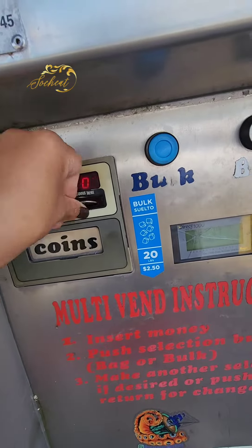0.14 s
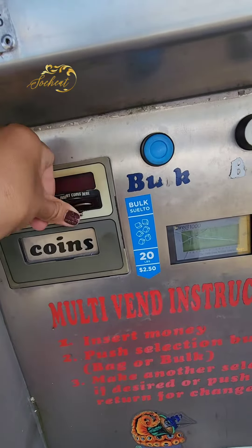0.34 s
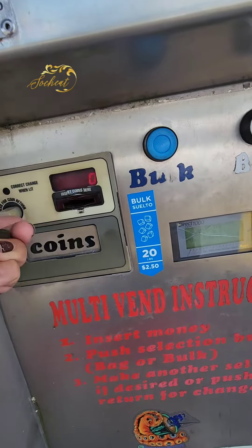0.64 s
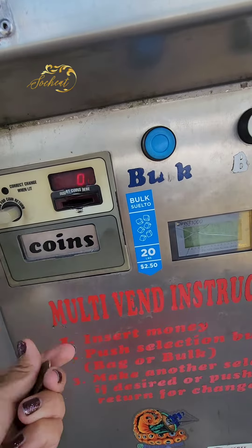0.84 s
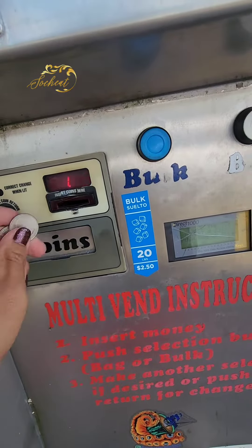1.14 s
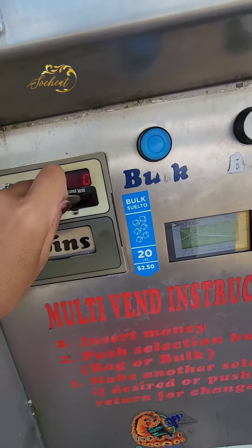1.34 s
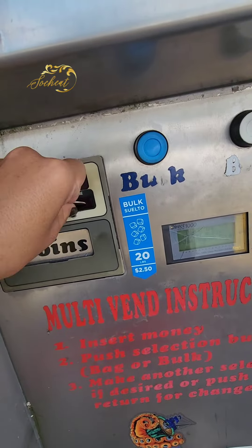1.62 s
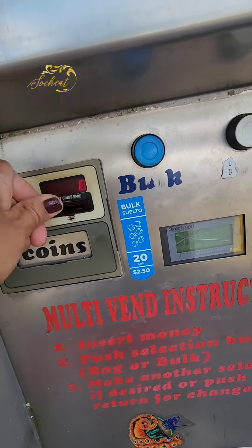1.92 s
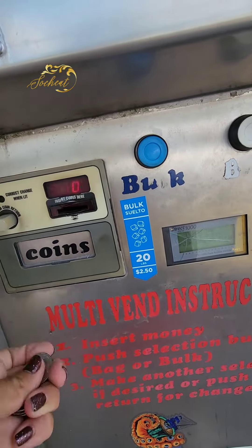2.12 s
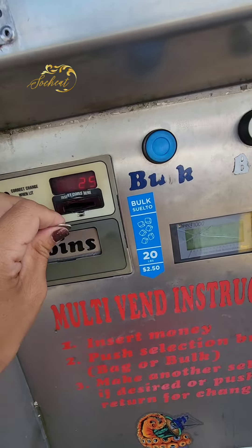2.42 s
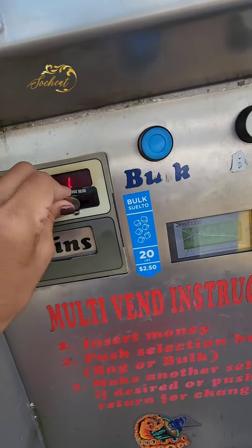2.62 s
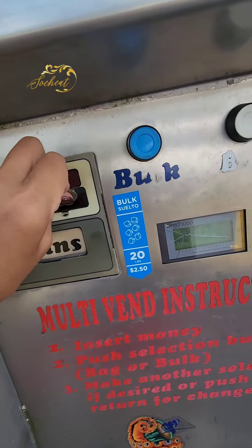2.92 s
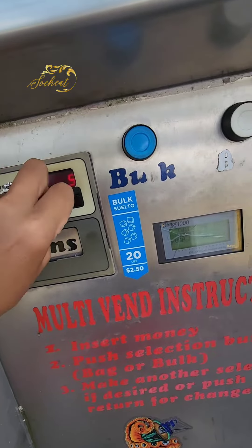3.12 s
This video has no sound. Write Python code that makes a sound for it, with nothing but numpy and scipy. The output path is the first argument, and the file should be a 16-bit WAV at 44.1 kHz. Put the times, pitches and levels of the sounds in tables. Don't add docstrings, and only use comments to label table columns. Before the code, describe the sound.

Three coins drop in turn into a metal vending machine slot, each rattling down a chute with sharp clacks, ticks and tiny high rings; machine hum and outdoor rumble underneath, heard close on a phone.

```python
import sys
import numpy as np
from scipy import signal
from scipy.io import wavfile
from scipy.ndimage import uniform_filter1d

SR = 44100
rng = np.random.default_rng(int(sys.argv[2]) if len(sys.argv) > 2 else 0)


def dump_mix(stems):
    frames = np.atleast_2d(stems).T
    limited = np.clip(frames, -1, 1)
    pcm = np.round(limited * 32767).astype(np.int16)
    wavfile.write(sys.argv[1], SR, pcm)


def natural_amplitude(level_db):
    exponent = np.asarray(level_db, float) / 20
    return 10 ** exponent


N = 143766

LEFT_LAG_S = -9 / 44100
GRIT_DB, OWN_SHARE = 3, 0.89
ATTACK_S, TAIL_T60_S = 0.0015, 0.17
SPREAD_DB = 3.5


def band(x, lo_hz, hi_hz):
    sos = signal.butter(2, [lo_hz, hi_hz], "band", fs=SR, output="sos")
    return signal.sosfilt(sos, x) * np.sqrt(SR / 2 / (hi_hz - lo_hz))


def ring(x, hz, t60):
    r = np.exp(-np.log(1000) / (max(t60, .004) * SR))
    gain = np.sqrt(1 - r * r)
    poles = [1, -2 * r * np.cos(2 * np.pi * hz / SR), r * r]
    return signal.lfilter([gain, 0, -gain], poles, x) / np.sqrt(2)


def walk(rate):
    hold = int(SR / rate)
    levels = np.repeat(rng.standard_normal(N // hold + 1), hold)
    return 0.92 * uniform_filter1d(uniform_filter1d(levels, hold), hold)[:N]


def ports(grit_db, wide):
    grit = natural_amplitude(grit_db * (rng.exponential(size=(3, N)) - 3.0)) * rng.standard_normal((3, N))
    wide = np.clip(wide, 0, 1)
    shared = np.array([np.roll(grit[0], int(round(LEFT_LAG_S * SR))), grit[0]])
    return np.sqrt(1 - wide ** 2) * shared + wide * grit[1:]


def chatter(times, db, t60, tail_db):
    t = np.arange(SR // 4) / SR
    env = np.zeros((db.shape[1], N + len(t)))
    for s, level, fall in zip(times, db, t60):
        decay = natural_amplitude(-60 * t / max(fall, .005)) + natural_amplitude(tail_db - 60 * t / TAIL_T60_S)
        start = int(s * SR)
        env[:, start:start + len(t)] += natural_amplitude(level)[:, None] * np.minimum(t / ATTACK_S, 1) * decay
    return env[:, :N]


def struck(modes, times, db, t60, tail_db, drive, spot_db=0):
    spread = SPREAD_DB * rng.standard_normal((len(times), len(modes)))
    gains = db[:, None] + np.array(modes)[:, 1] + spot_db + spread
    env = chatter(times, gains, t60, tail_db)
    rung = sum(ring(e * drive, hz, mode_t60) for e, (hz, _, mode_t60) in zip(env, modes))
    return rung / np.sqrt(len(modes))


# [t/s, peak level/dB, landing spot f/Hz, coin edge level/dB, chatter
# t60/s]
COIN_KNOCKS = [(0.0935, -24.5, 2800, -14, 0.041), (0.34, -16, 3100, -20, 0.15),
               (0.3657, -22, 3060, -31, 0.04), (0.428, -25.5, 1600, -23, 0.061),
               (0.509, -23.5, 1590, -14.5, 0.45), (0.537, -19, 6850, -8.5, 0.06),
               (0.557, -24, 2500, -4, 0.071), (0.607, -22.5, 2480, -37, 0.12),
               (0.6445, -21.5, 1940, -23, 0.084), (0.6565, -9.5, 1850, -12, 0.077),
               (0.693, -16.5, 1810, -14, 0.14), (0.725, -21, 4600, -8, 0.093), (0.74, -23, 4650, 2, 0.092),
               (0.7609, -7.5, 2040, -16, 0.056), (0.786, -23, 2260, -17, 0.34),
               (0.815, -11, 2650, -13, 0.058), (0.843, -26, 3130, -25, 0.075), (0.862, -18, 2100, -15, 0.11),
               (0.886, -20, 3900, -17, 0.33), (0.9714, -19, 3800, -15, 0.11),
               (1.2227, -26.5, 4850, -6.5, 0.31), (1.291, -27.5, 1400, -13.5, 0.12),
               (1.363, -8.5, 3260, -35, 0.054), (1.3926, -23, 1400, -27, 0.25),
               (1.4385, -19.5, 5750, -15, 0.11), (1.593, -20, 3200, -25, 0.062),
               (1.6438, -23, 1490, -5.5, 0.21), (1.653, -43, 2060, 2, 0.72),
               (1.7172, -28.5, 1660, -7, 0.56), (1.8565, -14.5, 3300, -15.5, 0.13),
               (1.9706, -25, 2530, -9, 0.043), (1.9928, -20.5, 1610, -16.5, 0.31),
               (2.0864, -18.5, 2460, -33, 0.053),
               (2.1153, -16.5, 2500, -31, 0.039), (2.132, -1.5, 2400, -11.5, 0.051),
              (2.16, -18.5, 1830, -35, 0.12), (2.2, -14, 2470, -29, 0.037),
              (2.2182, -13.5, 1840, -14, 0.18), (2.2994, -9, 2400, -13, 0.049),
              (2.344, -20.5, 1920, -15, 0.12), (2.36, -13, 3950, -18, 0.11), (2.41, -21.5, 4300, -16, 0.27),
              (2.4576, -18, 3920, -17, 0.044), (2.595, -25.5, 2070, -21, 0.2),
              (2.6716, -21, 2750, -23, 0.096), (2.8552, -24, 2800, -18, 0.37),
              (2.883, -3.5, 3480, -9, 0.041), (2.9075, -6, 3020, -1.5, 0.022),
              (2.952, -24, 2140, -36, 0.082), (3.0032, -22.5, 3240, -39, 0.12),
              (3.046, -27, 1590, -16, 0.048), (3.1384, -13, 1920, -9, 0.086),
              (3.151, -34.5, 4300, 1.5, 0.44)]
# [f/Hz, level/dB, t60/s]
CHUTE_MODES = [(590, 7, 0.048), (867, 3.5, 0.068), (1080, 2, 0.022), (1400, -3, 0.0064), (1830, -4, 0.029),
               (2184, 2, 0.0065), (2480, -6, 0.062), (2760, -0.5, 0.0061), (3260, -8, 0.093),
               (4140, -1.5, 0.0034), (4850, -25, 0.034), (5820, -7, 0.011), (6500, -3, 0.0091)]
EDGE_MODES = [(7300, -4, .015), (9400, -5, .02), (10500, -5, .012), (11600, -4, .015), (12800, -2, .02),
              (14400, 0, .01)]
CHUTE_DB, CHUTE_CRACK_DB = -8, -22
EDGE_DB, EDGE_CRACK_DB = -13, -2
FOCUS_DB, FOCUS_OCT, SLOPE_DB_OCT = 8, 0.083, 7.5
TAIL_DB = -19.5
CHUTE_PAN_DB, EDGE_PAN_DB = -1.5, -2.5


def knocks():
    s, db, spot_hz, edge_db, t60 = np.array(COIN_KNOCKS).T
    away_oct = np.abs(np.log2(np.array(CHUTE_MODES)[:, 0] / spot_hz[:, None]))
    spot_db = FOCUS_DB * np.exp(-(away_oct / FOCUS_OCT) ** 2) - SLOPE_DB_OCT * away_oct
    low, high = ports(GRIT_DB, OWN_SHARE), ports(GRIT_DB, OWN_SHARE)

    chute = struck(CHUTE_MODES, s, db + CHUTE_DB, t60 * 0.9, TAIL_DB, low, spot_db)
    crack = chatter(s, db[:, None] + CHUTE_CRACK_DB, t60, TAIL_DB) * low
    chute = chute + band(crack, 920, 5170)
    boom = signal.lfilter(*signal.butter(2, 1600, fs=SR), chute)
    chute = chute + np.array([[1], [-.2]]) * boom

    level = db + edge_db
    rim = struck(EDGE_MODES, s, level + EDGE_DB, t60 * 0.11, TAIL_DB - 12, high)
    dull_modes = [(hz, 0, .004) for hz in np.arange(4500, 16500, 1000)]
    rim = rim + struck(dull_modes, s, level + EDGE_CRACK_DB, t60 * 0.6, TAIL_DB - 5.5, high)

    sides = np.array([[1], [-1]]) / 2
    return chute * natural_amplitude(CHUTE_PAN_DB * sides) + rim * natural_amplitude(EDGE_PAN_DB * sides)


# [t/s, peak level/dB, f/Hz]
CLUNKS = [
    (.513, -26.5, 574),
    (0.658, -26, 1080),
    (0.76, -17.5, 1886),
    (1.995, -30.5, 590),
    (2.137, -17, 2480),
    (2.885, -7.5, 3260),
    (3.003, -30, 863),
    (2.3, -28, 338),
]
CLUNK_CYCLES = 18


def clunks():
    t = np.arange(N) / SR - np.array([[LEFT_LAG_S / 2], [0]])
    out = 0
    for s, db, hz in CLUNKS:
        age = np.maximum(t - s, 0)
        pair = np.sin(2 * np.pi * hz * age) + 0.25 * np.sin(2 * np.pi * hz * 2.3 * age)
        fade = natural_amplitude(db - 60 * age / (0.037 + CLUNK_CYCLES / hz))
        out = out + fade * np.minimum(age / 0.00065, 1) * pair
    return out


# [t/s, peak level/dB, f/Hz, t60/s]
TICKS = [(.494, -37, 6640, 0.016), (0.513, -37.5, 1616, 0.12), (.5387, -34, 6900, 0.027),
         (.5577, -23.5, 9430, 0.015), (.609, -35, 4620, 0.04), (0.657, -17.5, 4110, 0.022),
         (0.719, -28, 1950, 0.032), (0.816, -24.5, 2386, .03), (0.846, -42, 5870, 0.012),
         (.864, -27.5, 1980, 0.045), (.889, -21.5, 4230, 0.026), (.906, -31, 2100, 0.025),
         (0.939, -46, 8050, 0.14), (.961, -34, 4350, 0.033), (1.122, -42, 4270, .04),
         (1.152, -37.5, 4380, 0.054), (1.858, -25.5, 3240, 0.044), (2.137, -26.5, 933, .06),
         (.53, -41.5, 2510, 0.45), (2.116, -25, 2610, 0.034), (2.117, -30, 4150, 0.036),
         (2.137, -20.5, 4840, 0.029), (1.999, -45, 2570, 0.61), (2.167, -30, 2430, 0.055),
         (2.22, -25, 1864, 0.031), (2.223, -24, 4800, 0.032), (2.236, -30, 2210, 0.081),
         (2.3, -24.5, 4340, .03), (2.301, -26.5, 2450, 0.058), (2.346, -26.5, 1905, 0.027),
         (2.366, -39, 6900, .05), (2.675, -38, 2700, 0.014), (2.726, -37.5, 2000, .03),
         (2.762, -40, 4400, .04), (2.884, -16, 6500, 0.01), (2.892, -20, 1875, 0.023),
         (2.908, -16.5, 13000, 0.031), (2.909, -23.5, 5560, 0.027), (2.952, -39, 7200, 0.019),
         (3.002, -35, 3030, .04), (3.003, -23, 557, 0.037), (3.015, -36, 3400, .03),
         (3.049, -37, 2930, 0.035), (3.145, -38, 6310, 0.15), (.36, -34.5, 582, 0.2),
         (.341, -31.5, 3070, 0.063)]
TICK_RISE_S, TICK_ROUGH = 0.001, .5


def ticks():
    age = np.arange(8000) / SR
    out = np.zeros((2, N + len(age)))
    chance = rng.random((len(TICKS), 3))
    for (s, db, hz, t60), (lag, side, turn) in zip(TICKS, chance):
        env = natural_amplitude(db - 60 * age / max(t60, .005)) * np.minimum(age / TICK_RISE_S, 1)
        env[:6] += natural_amplitude(db)
        jitter = uniform_filter1d(rng.standard_normal((2, len(age))), size=32)
        rough = 1 + TICK_ROUGH * 4 * jitter
        phase = 2 * np.pi * (hz * age + turn + np.array([[.3 * lag - .15], [0]]))
        pan = natural_amplitude(np.array([[1], [-1]]) * (4 * side - 3))
        start = int(s * SR)
        out[:, start:start + len(age)] += env * rough * np.sin(phase) * pan
    return out[:, :N]


# [middle t/s, level/dB, f/Hz, half length/s]
SLIDES = [
    (0.537, -35, 5700, 0.023),
    (0.727, -25.5, 5860, 0.01),
    (0.729, -26, 11100, 0.0094),
    (2.872, -40.5, 3900, 0.0044),
    (2.894, -24, 3780, 0.011),
    (1.149, -48, 4900, 0.036),
    (2.741, -54, 6800, 0.089),
]
SLIDE_WIDTH, SLIDE_GRIT_DB = 1.41, 4


def slides():
    t = np.arange(N) / SR
    drive = ports(SLIDE_GRIT_DB, OWN_SHARE)
    drive = drive / drive.std()
    out = 0
    for s, db, hz, half in SLIDES:
        swell = natural_amplitude(db) * np.exp(-((t - s) / half) ** 2)
        out = out + band(swell * drive, hz / SLIDE_WIDTH, hz * SLIDE_WIDTH)
    return out


# [t/s, peak level/dB, large coin level/dB, jostle t60/s]
SINGING = [(0.5576, -30, -8, 0.054), (0.7253, -24, -19, 0.12), (0.8884, -24, -23, 0.18),
           (0.9747, -29, -12, 0.1), (1.653, -19, 3, 0.32), (1.732, -27, -4, 0.21),
           (1.9939, -23, -21, 0.077), (2.3615, -25, -19, 0.1), (2.597, -30.5, 20, 0.029),
           (3.1363, -29, 8, 0.14), (3.1694, -28, 1, 0.22)]
# [f/Hz, level/dB, t60/s]
LARGE_COIN = [(9400, 0, .04), (15050, 3, .04)]
SMALL_COIN = [(15440, -4, .04), (15650, 0, .04)]
LARGE_DB, SMALL_DB = -18, -6.5


def singing():
    s, db, large_db, t60 = np.array(SINGING).T
    drive = ports(GRIT_DB, OWN_SHARE)
    small = struck(SMALL_COIN, s, db + SMALL_DB, t60, -60, drive)
    large = struck(LARGE_COIN, s, db + large_db + LARGE_DB, t60, -60, drive)
    return small + large


# [multiple of the shaft rate, rms level/dB]
SHAFT_ORDERS = [
    (8, -53.5),
    (9, -52.5),
    (14, -56),
    (15, -66),
    (18, -51.5),
    (20, -63),
]
# [f/Hz, rms level/dB]
FAN = [
    (189.9, -40),
    (276.5, -50),
]
SHAFT_HZ, WOBBLE_DB = 28.61, 4
VALVE_DB, VALVE_WOBBLE_DB = -28.5, 0.64
HUM_PAN_DB = 1.3


def hum():
    turn = 2 * np.pi * np.cumsum(1 + 0.00277 * walk(3.16)) / SR
    tones = [(order * SHAFT_HZ, db, WOBBLE_DB) for order, db in SHAFT_ORDERS]
    tones += [(6 * SHAFT_HZ, VALVE_DB, VALVE_WOBBLE_DB)]
    tones += [(hz, db, 2.5) for hz, db in FAN]
    right = 0
    for hz, db, wobble_db in tones:
        level = np.sqrt(2) * natural_amplitude(db + wobble_db * walk(5.96))
        right = right + level * np.sin(hz * turn + 2 * np.pi * rng.random())
    left = np.roll(right, int(round(LEFT_LAG_S * SR)))
    return np.array([left * natural_amplitude(HUM_PAN_DB / 2), right * natural_amplitude(-HUM_PAN_DB / 2)])


# [t/s, rms level/dB]
ENGINE = [
    (0, -34.5),
    (.85, -34),
    (1.05, -45),
    (1.5, -40.5),
    (1.8, -34),
    (2.3, -37),
    (2.5, -43),
    (3.26, -43),
]
ENGINE_HZ = 111.9


def engine():
    s, db = np.array(ENGINE).T
    level = natural_amplitude(np.interp(np.arange(N) / SR, s, db) + 3.2 * walk(17))
    phase = 2 * np.pi * np.cumsum(ENGINE_HZ * (1 + 0.023 * walk(8))) / SR
    return np.sqrt(2) * level * np.sin(phase)


# [f/Hz, level/dB per Hz]
AIR = [
    (25, -11.5),
    (92, -2.5),
    (175, -6.5),
    (354, -18.5),
    (516, -16),
    (800, -23.5),
    (4000, -39),
    (16000, -45),
]
AIR_DB, SWELL_DB, FLICKER_DB = -32.5, .6, 2
WIDE_HZ, WIDE_SHARE = 710, 1


def air():
    out, swell = 0, walk(0.26)
    table_hz, table_db = np.array(AIR).T
    for hz in 25 * 2 ** np.arange(0, 9.4, .5):
        noise = band(ports(0, min(hz / WIDE_HZ, 1) * WIDE_SHARE), hz / 1.235, hz * 1.147)
        db = np.interp(np.log(hz), np.log(table_hz), table_db) + 10 * np.log10(hz)
        out = out + natural_amplitude(db + SWELL_DB * swell + FLICKER_DB * walk(8.52)) * noise
    return out * natural_amplitude(AIR_DB) / np.sqrt(np.mean(out ** 2))


def scene():
    coins = knocks() + clunks() + ticks() + slides() + singing()
    return coins + hum() + engine() + air()


def band_limit(x):
    return signal.sosfilt(signal.butter(12, 17150, fs=SR, output="sos"), x)


def record(dry):
    top_cut = signal.ellip(6, .3, 32, 15750, fs=SR, output="sos")
    mix = signal.sosfilt(top_cut, dry)
    return band_limit(mix)


dry = scene()
out = record(dry)
dump_mix(out)
```